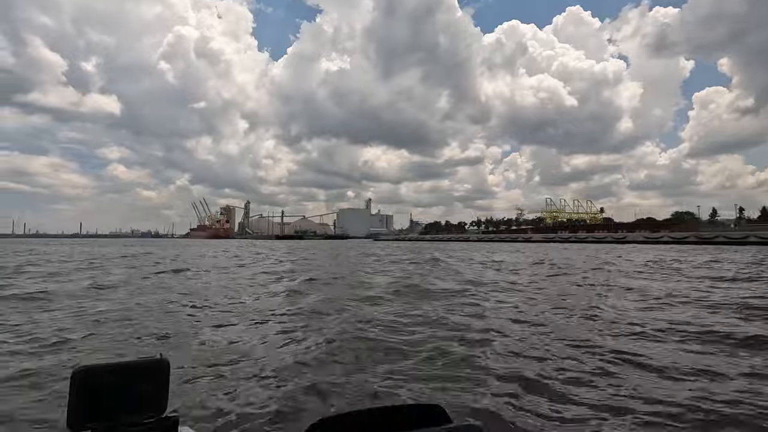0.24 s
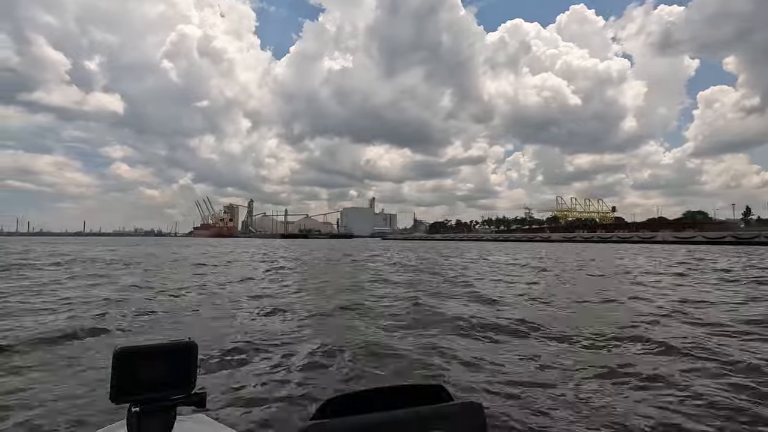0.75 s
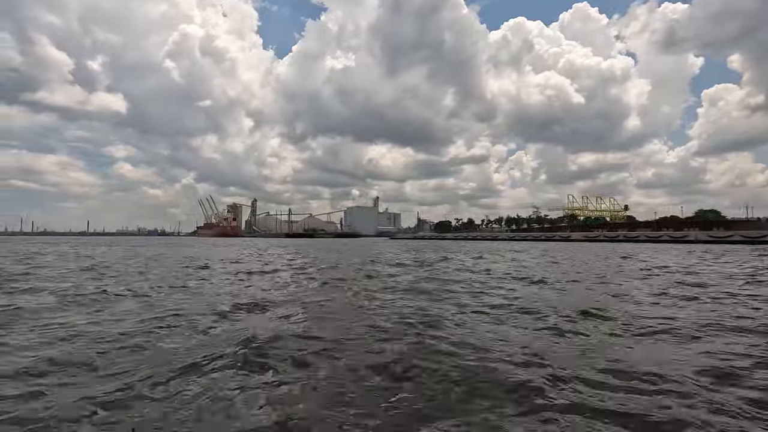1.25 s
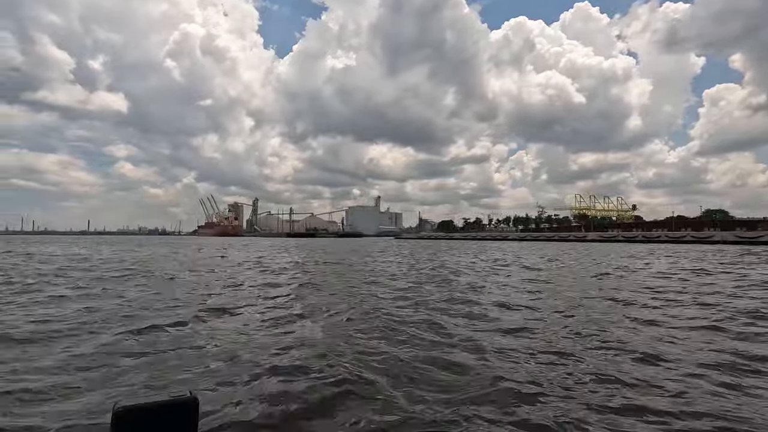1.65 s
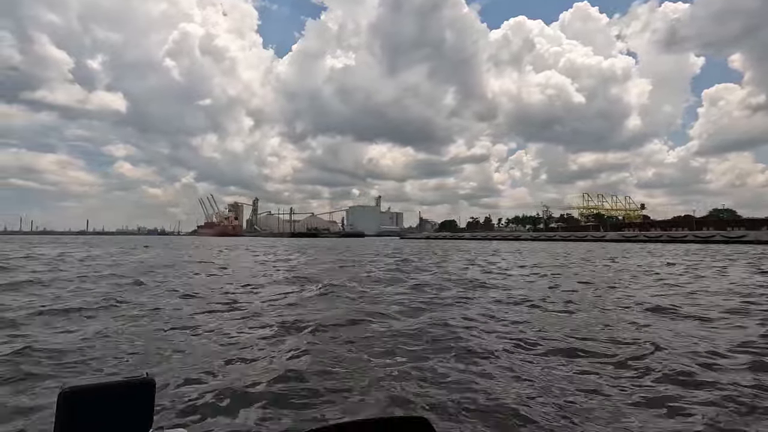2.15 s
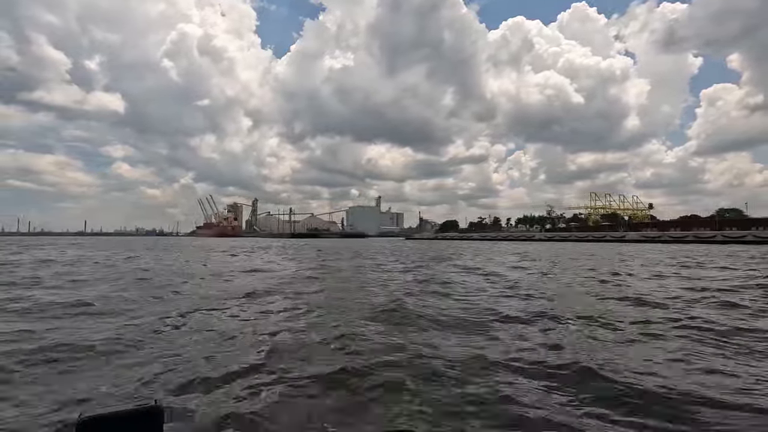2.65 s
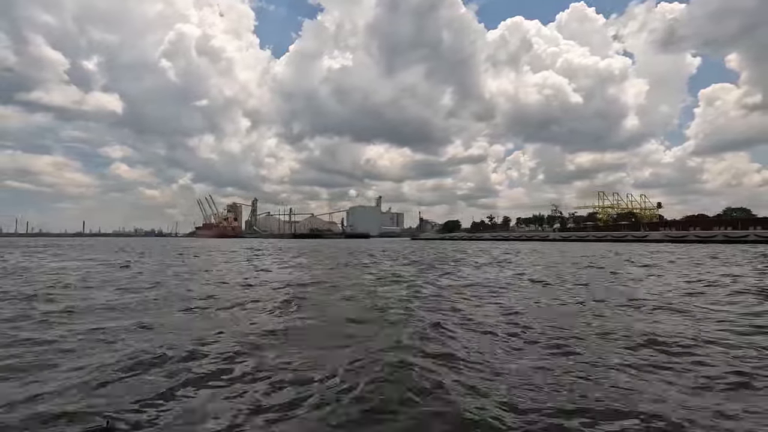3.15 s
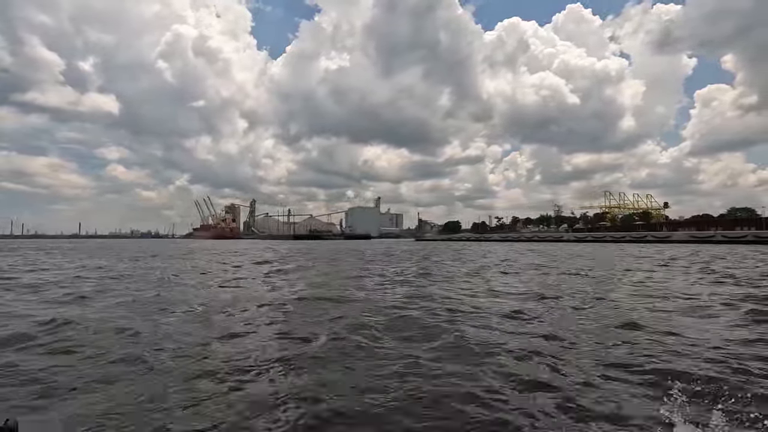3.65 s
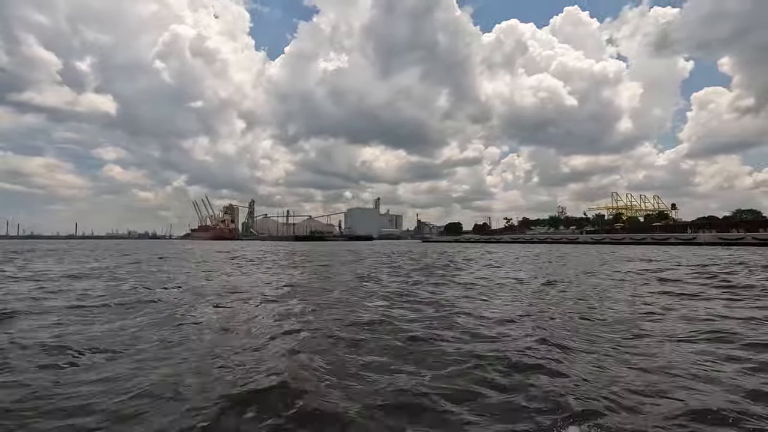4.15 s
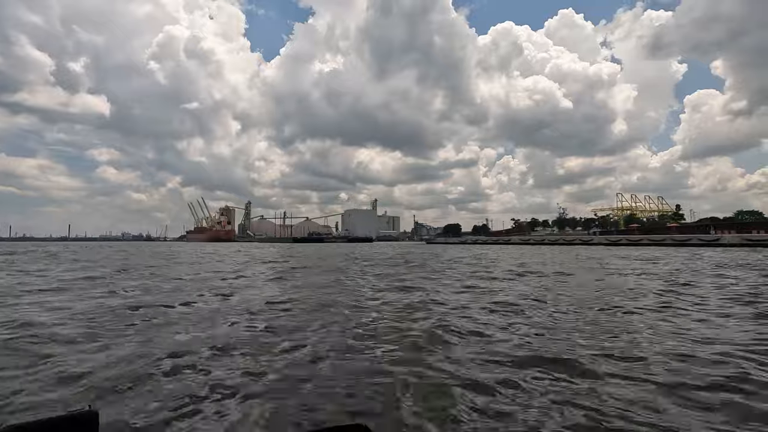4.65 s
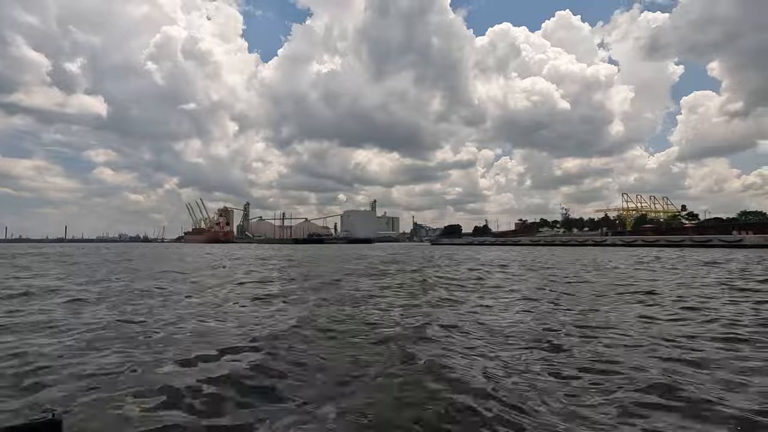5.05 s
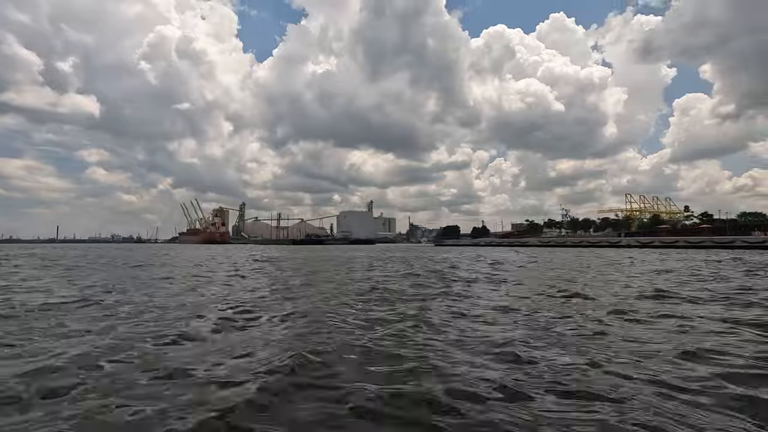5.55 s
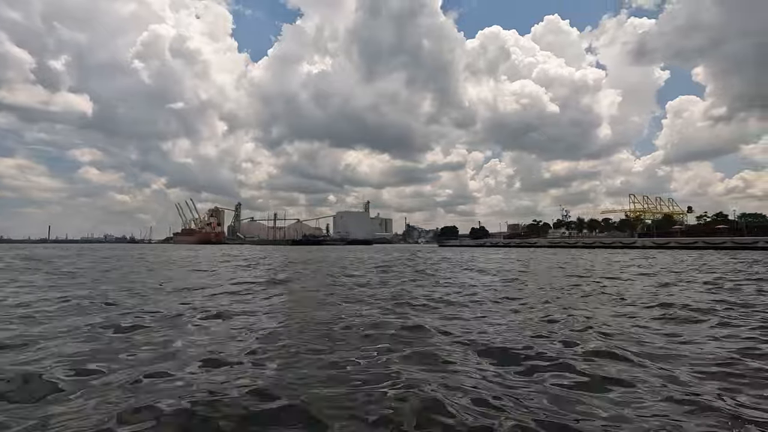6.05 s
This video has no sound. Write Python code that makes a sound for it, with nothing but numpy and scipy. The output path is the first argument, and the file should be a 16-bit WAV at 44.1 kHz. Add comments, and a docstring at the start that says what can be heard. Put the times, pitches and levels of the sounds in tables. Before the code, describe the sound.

On-board low engine drone with gurgling wet exhaust and rushing, pattering spray; near the end the pitch drops slightly and the water grows louder.

```python
"""On board a personal watercraft cruising over choppy water, heard through a boxed-in microphone.
A three-cylinder four-stroke hums through its wet exhaust, as harmonics of the firing rate with weak lines at its thirds;
gurgling noise pulsed by unequal firings makes it burble. Hull and jet throw up spray, as bands of noise
and ringing drops that swell wave after wave. Then the throttle eases, the note sinks and the burble grows."""
import sys
import numpy as np
from scipy import signal
from scipy.fft import rfft, irfft, next_fast_len
from scipy.io import wavfile

SR = 44100
rng = np.random.default_rng(int(sys.argv[2]) if len(sys.argv) > 2 else 0)


def inscribe(sig):
    """Save sig as 16-bit PCM at rate SR to the path in sys.argv[1].

    A 1-D sig is mono; a 2-D sig holds one channel per row.
    Samples are clipped to [-1, 1] before scaling.
    """
    pcm = np.round(np.clip(np.atleast_2d(sig).T, -1, 1) * 32767)
    wavfile.write(sys.argv[1], SR, pcm.astype(np.int16))


N = 277372


def from_db(db):
    """Decibels to gain."""
    return np.exp(np.asarray(db) * np.log(10) / 20)


def rms_one(x):
    """Scale to rms 1."""
    return x / np.sqrt(np.mean(x ** 2) + 1e-20)


def in_time(rows):
    """Columns of a table after its time column, one value per sample."""
    s, *columns = np.transpose(rows)
    t = np.arange(N) / SR
    return [np.interp(t, s, column) for column in columns]


def at_hz(points, hz):
    """Read a spectrum on a log-frequency axis."""
    table_hz, level_db = np.transpose(points)
    return np.interp(np.log(hz), np.log(table_hz), level_db)


def colour(x, spectrum):
    """Weight each frequency by a spectrum."""
    size = next_fast_len(N)
    hz = np.maximum(np.arange(size // 2 + 1) * SR / size, 1)
    return irfft(rfft(x, size) * from_db(at_hz(spectrum, hz)), size)[:N]


def drift(rate):
    """Slow chance of spread 1, changing about rate times a second: noise through a two-pole low-pass."""
    step = 40  # samples between drawn values
    warm_up = 2000  # values dropped while the filter settles
    r = np.exp(-2 * np.pi * rate * step / SR)
    noise = rng.standard_normal(N // step + 2 + warm_up)
    slow = rms_one(signal.lfilter([1], [1, -2 * r, r * r], noise)[warm_up:])
    return np.interp(np.arange(N) / step, np.arange(len(slow)), slow)


# engine note heard on board: (time [s], firing rate [Hz])
FIRING_RATE = [(0, 113.3), (.11, 115.2), (.24, 113.3), (.44, 112.2), (.62, 113.2), (.8, 111.8),
               (1.1, 112.2), (1.29, 114.3), (1.54, 112.7), (1.68, 113.2), (2.3, 111.8), (2.84, 113.5),
               (3.08, 112.8), (3.24, 110.7), (3.7, 111), (4.19, 111.6), (4.36, 108.4), (4.62, 107.1),
               (4.75, 103.4), (5.1, 101.7), (5.8, 101.4), (6.0, 103), (6.29, 102.2)]
FLUTTER_HZ = 0.35  # chance wobble of the firing rate


def firing_rate():
    """Firings per second, following the throttle with a small chance wobble."""
    return in_time(FIRING_RATE)[0] + FLUTTER_HZ * drift(13.7)


CRUISE_HZ, EASED_HZ = 107.6, 102.8  # firing rates between which the tone changes


def easing(hz):
    """0 at cruise, 1 with the throttle eased."""
    return np.clip((CRUISE_HZ - hz) / (CRUISE_HZ - EASED_HZ), 0, 1)


# loudness of the note as the outlet dips and lifts:
# (time [s], level of harmonic 1 [dB], of harmonic 2 [dB], of harmonic 3 [dB])
LOW_HARMONICS = [(0, -34, -12, -25), (.11, -25.5, -14, -20), (.36, -36.5, -10, -16.5),
                 (.6, -30.5, -14, -20), (.8, -28, -16, -15.5), (1.02, -33.5, -11, -16),
                 (1.2, -35, -11.5, -19), (1.32, -32, -16, -20.5), (1.5, -23.5, -12.5, -15.5),
                 (1.66, -40.5, -10.5, -18.5), (1.86, -32, -15, -16), (2.0, -34, -13, -18),
                 (2.28, -29.5, -13, -16), (2.45, -32.5, -13.5, -16.5), (2.85, -30, -12, -19.5),
                 (3.3, -33, -15.5, -15.5), (3.45, -29.5, -12, -15), (3.63, -33, -16, -15),
                 (3.8, -36, -11, -16.5), (4.0, -28.5, -20, -16), (4.25, -30, -15.5, -14.5),
                 (4.54, -36.5, -12.5, -14.5), (4.72, -46, -21, -27), (4.97, -43, -15.5, -23.5),
                 (5.08, -46, -18.5, -21.5), (5.38, -41, -16.5, -26), (5.85, -41, -20, -23.5),
                 (6.03, -40, -15, -25), (6.2, -40, -20.5, -25.5)]
# the harmonics above: (harmonic number, level at cruise [dB], level eased [dB],
# share of the third's swing followed at cruise [dB per dB], chance wander [dB])
HIGH_HARMONICS = [(4, -26, -31.5, 0.58, 1.5), (5, -37, -44, -.1, 1.5), (6, -44, -49, 0.17, 2)]
MEAN_THIRD_DB = -17  # the third harmonic's swing is counted from here


def harmonic_levels(eased):
    """Number and level in dB of each harmonic; the high ones partly follow the third until the throttle eases."""
    levels_db = list(enumerate(in_time(LOW_HARMONICS), 1))
    third_swing_db = levels_db[2][1] - MEAN_THIRD_DB
    for k, cruise_db, eased_db, follows, wander_db in HIGH_HARMONICS:
        level_db = cruise_db + follows * third_swing_db
        level_db = level_db + eased * (eased_db - level_db)
        levels_db.append((round(k), level_db + wander_db * drift(3.5)))
    return levels_db


MUFFLER_HZ, MUFFLER_WIDTH_HZ = 400, 80  # resonance of each chamber


def exhaust_note(firings, hz, levels_db):
    """The steady part of the firing: clean harmonics, each wavering a little as water fills the outlet."""
    out = 0
    for k, level_db in levels_db:
        # two muffler chambers delay the phase, most near and above their resonance
        lag = 2 * np.arctan2(k * hz * MUFFLER_WIDTH_HZ, MUFFLER_HZ ** 2 - (k * hz) ** 2)
        gain = np.sqrt(2) * from_db(level_db + 0.97 * drift(30))
        phase = 2 * np.pi * k * firings - lag + 0.17 * drift(4.7)
        out = out - gain * np.sin(phase)
    return out


# lines between the harmonics: (thirds of the firing rate [count], level at cruise [dB], level eased [dB])
THIRD_LINES = [(4, -40, -37.5), (7, -33.5, -32.5), (8, -35.5, -29), (10, -39.5, -36), (11, -40.5, -62),
               (13, -42, -35), (17, -55.5, -42.5)]


def unequal_cylinders(firings, hz):
    """Three differing cylinders put weak lines at thirds of the firing rate; their balance shifts with speed."""
    eased = easing(hz)
    out = 0
    for third, cruise_db, eased_db in THIRD_LINES:
        level_db = cruise_db + eased * (eased_db - cruise_db) + 2.6 * drift(2.3)
        cycles = round(third) * firings / 3 + rng.random()
        out = out + np.sqrt(2) * from_db(level_db) * np.cos(2 * np.pi * cycles)
    return out


BURBLE_CRUISE_DB, BURBLE_EASED_DB = -24.5, -21.5
BURBLE_FOLLOWS = 0.5  # dB per dB of spray: the gurgle swells as waves cover the outlet
MEAN_SPRAY_DB = -37  # the spray's swing is counted from here


def burble_level(spray_db, eased):
    """Level of the burble in dB: it follows the spray at cruise and is steady once eased."""
    cruise_db = BURBLE_CRUISE_DB + BURBLE_FOLLOWS * (spray_db - MEAN_SPRAY_DB)
    return cruise_db + eased * (BURBLE_EASED_DB - cruise_db)


# what the wet exhaust lets through: (frequency [Hz], relative level [dB per Hz])
WET_EXHAUST = [(25, -35.5), (50, -21.5), (90, -11.5), (150, -7.5), (260, -1), (380, -4), (520, -9.5),
               (700, -15), (1000, -22.5), (1500, -33.5), (4000, -62)]


def burble(firings, level_db):
    """Gas breaking through water: noise that jumps at each blow and dies away, blows unequal by chance."""
    blow = firings.astype(int)
    strength = from_db(3.0 * rng.standard_normal(blow[-1] + 1))[blow]
    dying = np.exp(-2.5 * (firings % 1))
    gurgle = rng.standard_normal(N) * (1.5 + strength * dying)
    return from_db(level_db) * rms_one(colour(gurgle, WET_EXHAUST))


# rumble of the hull underfoot: (frequency [Hz], relative level [dB per Hz])
HULL_RUMBLE = [(20, -11), (40, -3), (70, 5), (100, 1.5), (170, -10), (260, -37.5)]
# waves slapping the hull: (time [s], approximate peak level [dB])
HULL_SLAPS = [(0.099, -13), (2.83, -21), (3.123, -17), (4.381, -19), (4.764, -12), (4.929, -13.5),
              (5.149, -14), (5.957, -12.5)]


def hull(push_db):
    """A low rumble that comes and goes, and short dull slaps of noise that die in a few hundredths of a second."""
    rumble = from_db(push_db) * rms_one(colour(rng.standard_normal(N), HULL_RUMBLE))
    hits = np.zeros(N)
    for s, peak_db in HULL_SLAPS:
        hits[round(s * SR)] = from_db(peak_db - 10.5)  # noise peaks stand above its rms
    dying = signal.lfilter([1], [1, -from_db(-60 / (0.077 * SR))], hits + 1e-18)  # 60 dB down in 0.077 s
    band = signal.butter(2, [500, 2300], "band", fs=SR, output="sos")
    return rumble + dying * rms_one(signal.sosfilt(band, rng.standard_normal(N)))


# waves met by the hull, each a swell of spray and a push from below:
# (time [s], length [s], wash level [dB], spray level [dB], mist level [dB], push level [dB])
WAVES_MET = [(0.104, 0.15, -33.5, -35, -45, -35), (0.47, 0.043, -44, -38, -49, -41),
             (0.628, 0.17, -37.5, -36, -46, -40), (0.887, 0.14, -35, -46, -51, -48),
             (1.16, 0.074, -41, -40, -53, -42), (1.403, 0.23, -34, -35.5, -46.5, -37.5),
             (1.929, 0.31, -37.5, -36.5, -43.5, -41), (2.201, .12, -35.5, -36, -47.5, -32),
             (2.57, 0.23, -38, -36.5, -45, -35), (2.85, 0.091, -36, -36.5, -46, -39),
             (3.128, 0.25, -35, -36, -43, -36), (3.38, .18, -34.5, -36.5, -47, -41),
             (3.649, 0.15, -35.5, -35.5, -49, -38), (3.986, 0.22, -35.5, -33.5, -42, -35),
             (4.215, 0.18, -33.5, -34.5, -47, -34), (4.405, 0.28, -36, -38, -47, -42),
             (4.761, .22, -32, -32.5, -43, -35), (5.169, 0.22, -36, -33, -44, -36),
             (5.35, 0.078, -38, -39, -44, -45), (5.571, 0.24, -33, -31, -38.5, -32),
             (5.969, 0.18, -33, -33, -44, -40), (6.199, 0.16, -36.5, -32.5, -44, -33.5)]
# the steady rush between waves, planing and after the hull settles: (wash, spray, mist, push) [dB]
PLANING_DB, SETTLED_DB = (-36.5, -38.5, -45, -47.5), (-31.5, -32.5, -39, -38.5)
SETTLE_S, SETTLE_LENGTH_S = 4.99, 0.3  # middle and length of the sinking: the slowing hull sits deeper


def waves():
    """Levels of wash, spray, mist and push in dB: a steady part plus one bell-shaped swell per wave."""
    t = np.arange(0, N, 64) / SR
    settled = np.clip((t - SETTLE_S) / SETTLE_LENGTH_S + 0.5, 0, 1)
    s, length, *peaks_db = np.transpose(WAVES_MET)[:, :, None]
    bell = np.exp(-(2 * (t - s) / length) ** 2)
    levels_db = []
    for planing, deep, peak_db in zip(PLANING_DB, SETTLED_DB, peaks_db):
        steady_power = from_db(2 * (planing + settled * (deep - planing)))  # doubled dB: power
        swell_power = np.sum(from_db(2 * peak_db) * bell, axis=0)
        levels_db.append(10 * np.log10(steady_power + swell_power))
    return in_time(np.transpose([t, *levels_db]))


def water(spectrum, drops_per_s, spread_db, patchy_db):
    """Dense drops of uneven size on noise, split in half-octave bands that flicker partly together."""
    drops = rng.random((2, N)) < drops_per_s / SR
    source = rng.standard_normal((2, N))
    sizes_db = spread_db * np.minimum(rng.exponential(1, drops.sum()), 4)
    source[drops] *= 1 + from_db(sizes_db)
    out, together = 0, drift(7.6) + 1.27 * drift(40)
    edges = 140 * 2 ** np.arange(0, 7.1, 0.5)
    for k, (low, high) in enumerate(zip(edges, edges[1:])):
        level_db = at_hz(spectrum, np.sqrt(low * high))
        if level_db > -24:  # weaker bands are left out
            band_filter = signal.butter(2, [low, high], "band", fs=SR, output="sos")
            band = signal.sosfilt(band_filter, source[k % 2])  # neighbours use separate noise
            flicker_db = patchy_db * (1.17 * together + drift(27))
            out = out + from_db(level_db + flicker_db) * band
    return rms_one(out)


# wash along the hull: (frequency [Hz], relative level [dB per Hz])
WASH_SPECTRUM = [(250, -25), (600, -4), (900, -4.5), (1500, -5.5), (2200, -5.5), (3200, -16), (6000, -38)]


def wash(level_db):
    """The lowest, patchiest water: coarse drops of widely uneven size."""
    return from_db(level_db) * water(WASH_SPECTRUM, drops_per_s=1500.0, spread_db=4.5, patchy_db=1.1)


def patter(per_s, cycles):
    """Single drops land on the hull in clumps and ring a few cycles at pitches of their own."""
    landed = rng.random(N) < per_s * from_db(3.0 * drift(14)) / SR
    sizes = from_db(2.8 * np.minimum(rng.exponential(1, N), 4))
    strikes = landed * sizes * rng.choice([-1, 1], N)
    out, dealt = 0, rng.integers(0, 12, N)  # each drop is dealt one of 12 pitches
    for k, hz in enumerate(np.geomspace(900, 4200, 12)):
        r = from_db(-60 * hz / (cycles * SR))  # 60 dB down after the given cycles
        w = 2 * np.pi * hz / SR
        ring = [1, -2 * r * np.cos(w), r * r]
        out = out + signal.lfilter([0, np.sin(w)], ring, strikes * (dealt == k) + 1e-18)
    return rms_one(out)


# spray from hull and jet: (frequency [Hz], relative level [dB per Hz])
SPRAY_SPECTRUM = [(900, -19.5), (2000, -1.5), (2800, 1), (4000, 0.5), (5500, -4), (7500, -21.5),
                  (11000, -32.5)]


def spray(level_db):
    """Brighter water: denser drops, less uneven and less patchy than the wash."""
    return from_db(level_db) * water(SPRAY_SPECTRUM, drops_per_s=4000.0, spread_db=2.5, patchy_db=0.53)


# mist, the finest water: (frequency [Hz], relative level [dB per Hz])
MIST_SPECTRUM = [(3500, -36), (5500, -0.5), (7000, -2), (9000, -6), (12000, -9), (16000, -13)]


def mist(level_db):
    """The top of the water: a nearly even hiss of fine drops."""
    return from_db(level_db) * water(MIST_SPECTRUM, drops_per_s=3800.0, spread_db=-1.0, patchy_db=0.15)


DROPS_DB = -9.5  # patter against the wash


def scene():
    """Engine and water together."""
    hz = firing_rate()
    firings, eased = np.cumsum(hz) / SR, easing(hz)
    wash_db, spray_db, mist_db, push_db = waves()
    engine = exhaust_note(firings, hz, harmonic_levels(eased))
    engine = engine + unequal_cylinders(firings, hz)
    engine = engine + burble(firings, burble_level(spray_db, eased))
    drops = from_db(wash_db + DROPS_DB) * patter(per_s=270.0, cycles=18.0)
    sea = hull(push_db) + wash(wash_db) + drops + spray(spray_db) + mist(mist_db)
    return (engine + sea)[None]


# colour of the microphone's housing: (frequency [Hz], level [dB])
MICROPHONE_HOUSING = [(20, 2.5), (7500, -1), (8850, -6), (9500, -4.5), (10200, 0.5), (11150, -12),
                      (12100, -6), (13100, -20.5), (15100, -17), (15700, -26)]
TOP = 1.14  # the microphone rounds peaks towards this height
NOTCH_HZ, NOTCH_WIDTH_HZ = 9050, 220  # narrow band cancelled in the housing; width of one pass
CUTOFF_HZ = 15700


def record(dry):
    """Peaks are rounded; the housing dulls the treble and cancels one narrow band; the top is cut."""
    rounded = TOP * np.tanh(dry[0] / TOP)
    housed = colour(rounded, MICROPHONE_HOUSING)
    b, a = signal.iirnotch(NOTCH_HZ, NOTCH_HZ / NOTCH_WIDTH_HZ, fs=SR)
    notched = signal.lfilter(np.convolve(b, b), np.convolve(a, a), housed)  # the notch twice over
    top_cut = signal.ellip(12, 0.5, 70, CUTOFF_HZ, fs=SR, output="sos")
    return signal.sosfilt(top_cut, notched)[None]


dry = scene()
out = record(dry)
inscribe(out)
```